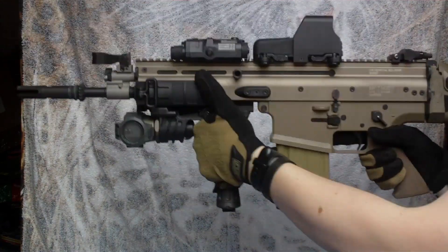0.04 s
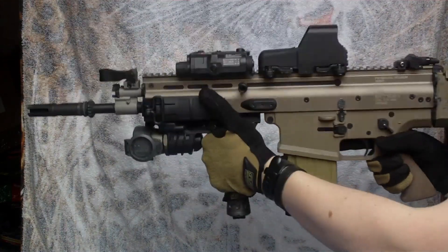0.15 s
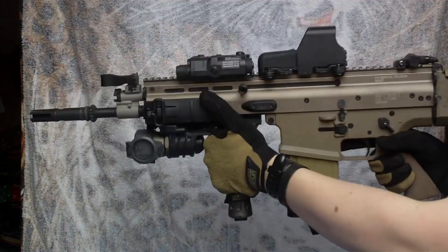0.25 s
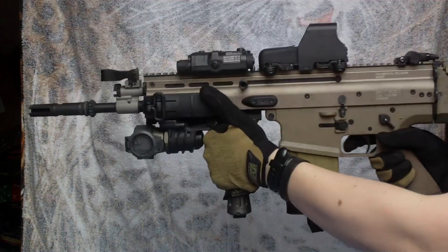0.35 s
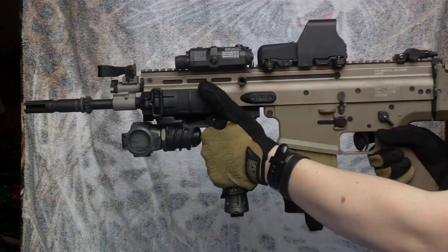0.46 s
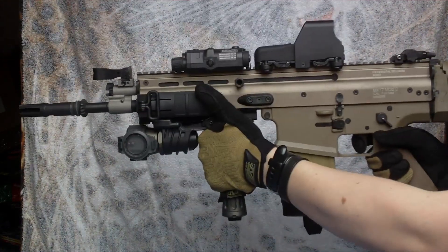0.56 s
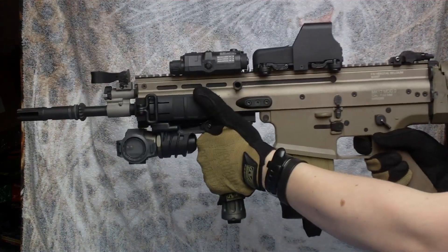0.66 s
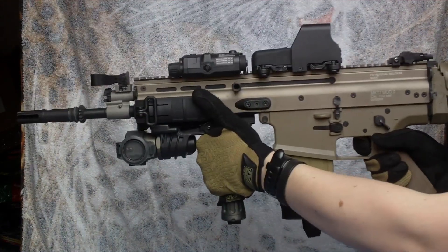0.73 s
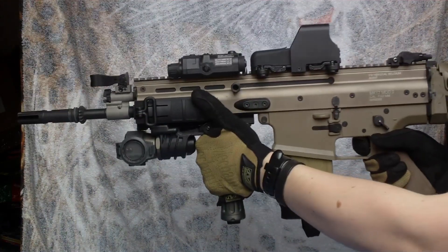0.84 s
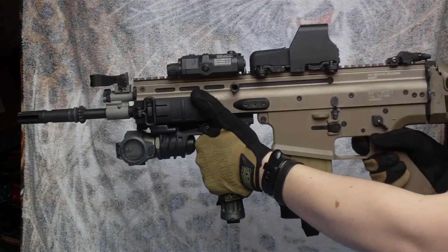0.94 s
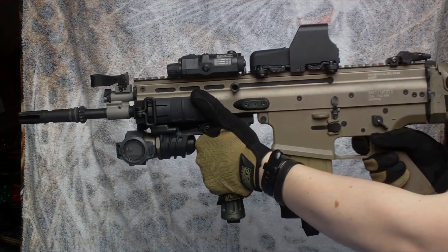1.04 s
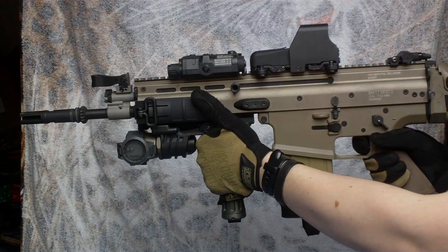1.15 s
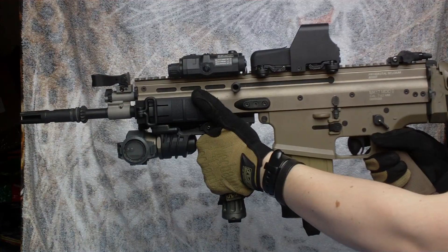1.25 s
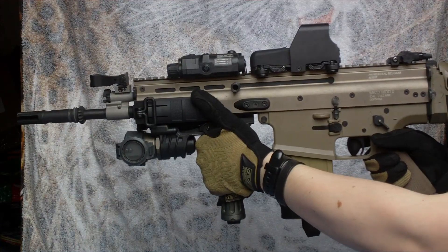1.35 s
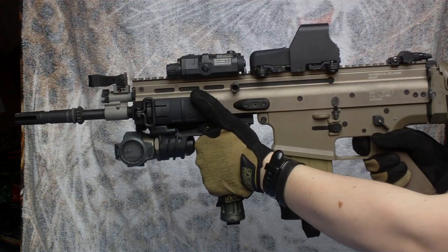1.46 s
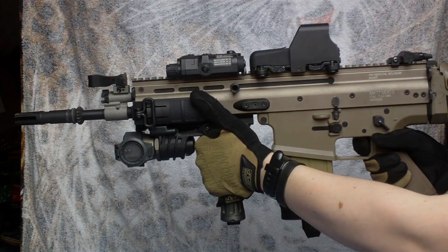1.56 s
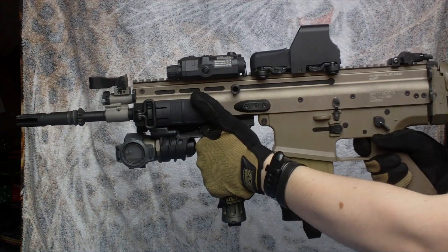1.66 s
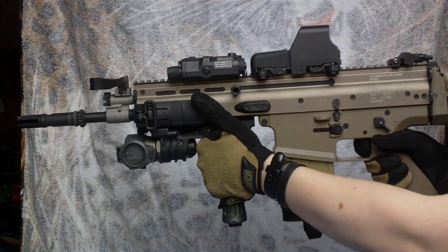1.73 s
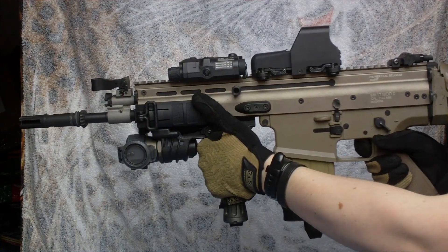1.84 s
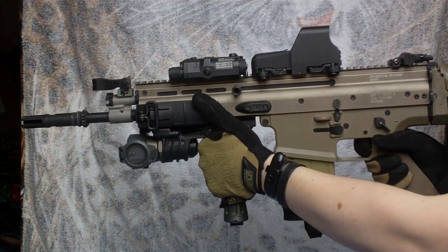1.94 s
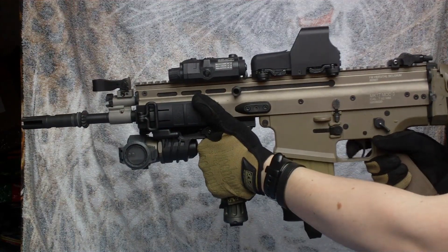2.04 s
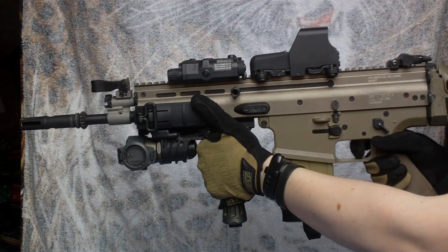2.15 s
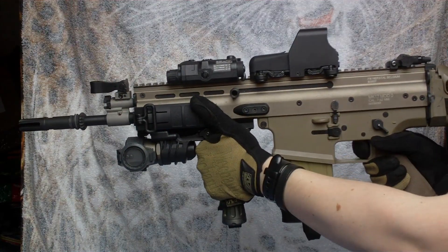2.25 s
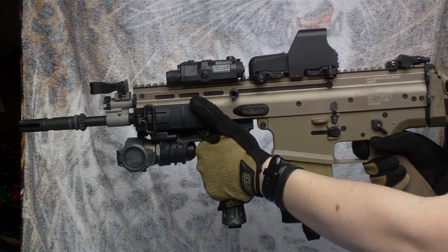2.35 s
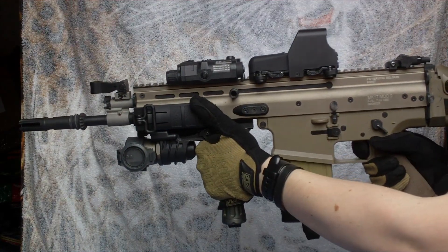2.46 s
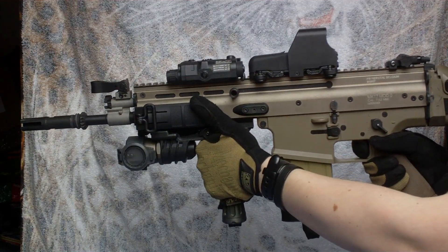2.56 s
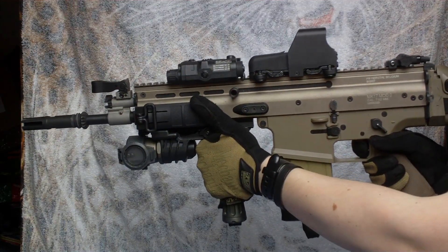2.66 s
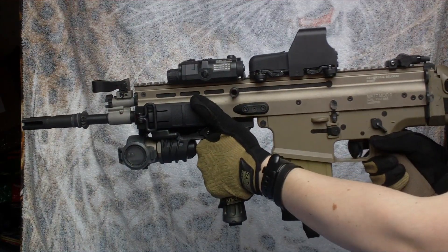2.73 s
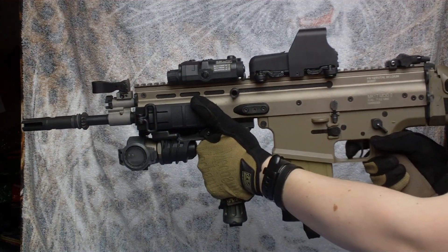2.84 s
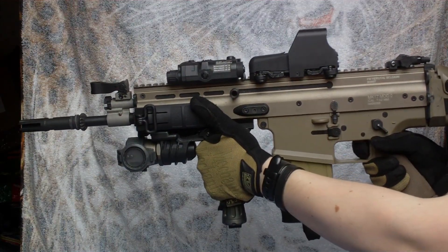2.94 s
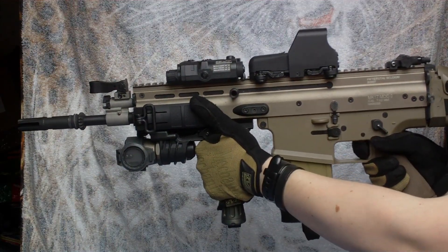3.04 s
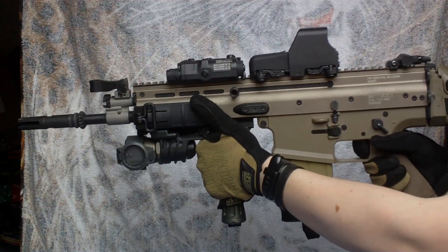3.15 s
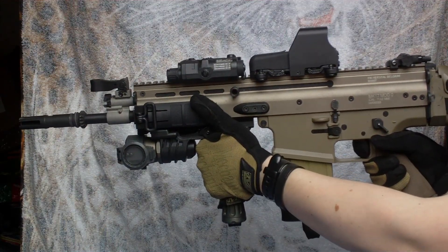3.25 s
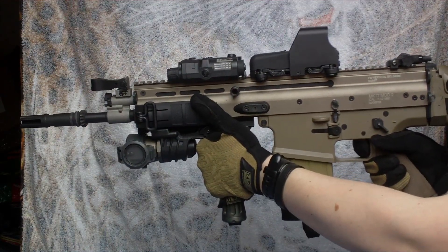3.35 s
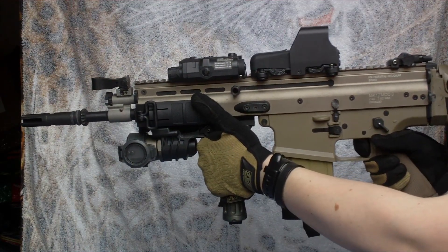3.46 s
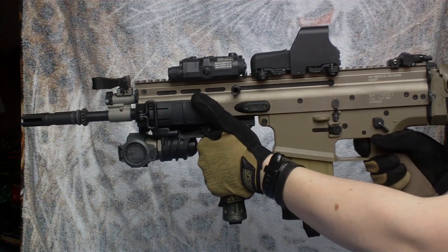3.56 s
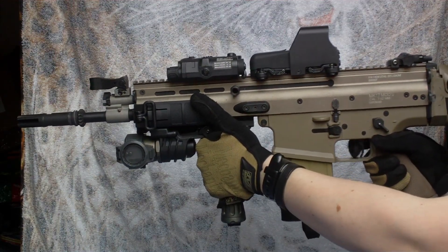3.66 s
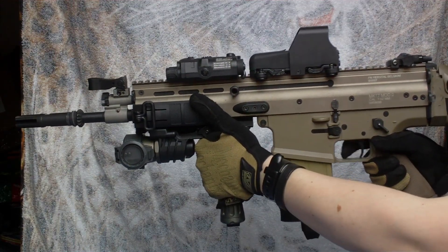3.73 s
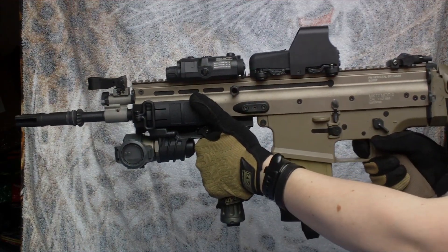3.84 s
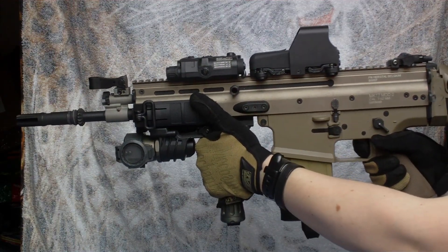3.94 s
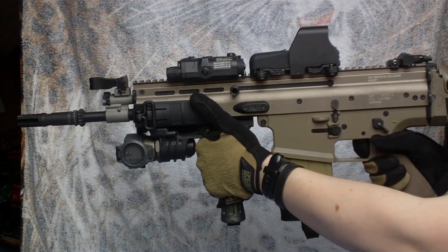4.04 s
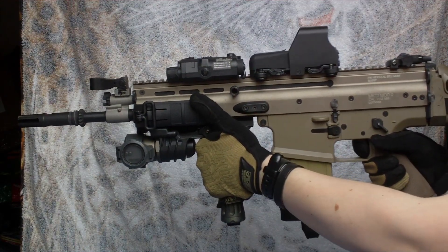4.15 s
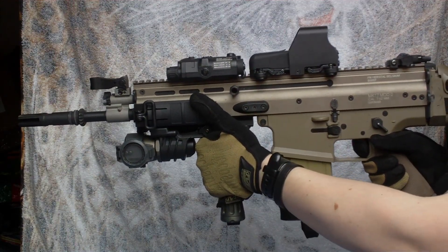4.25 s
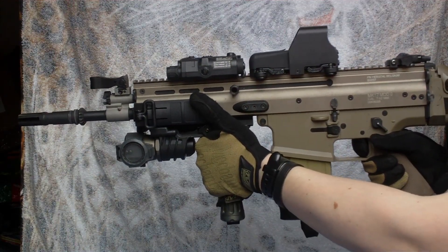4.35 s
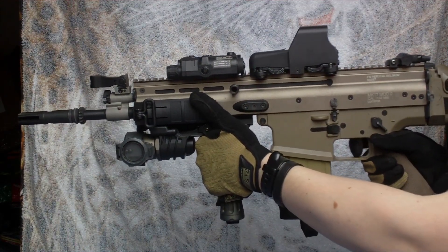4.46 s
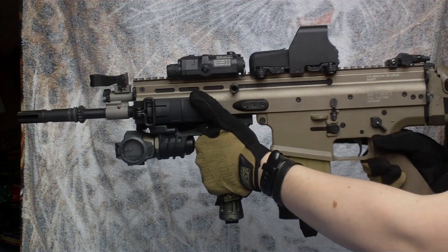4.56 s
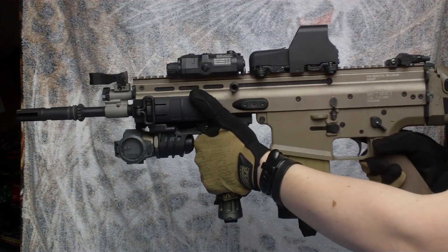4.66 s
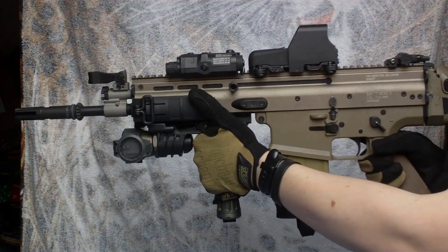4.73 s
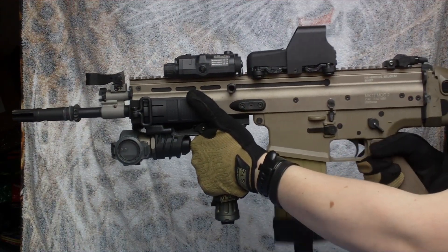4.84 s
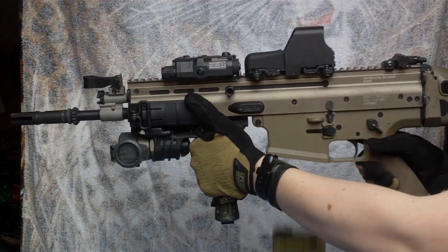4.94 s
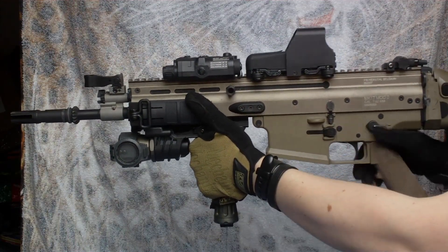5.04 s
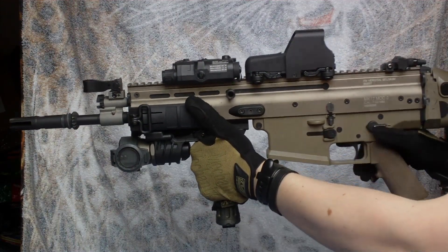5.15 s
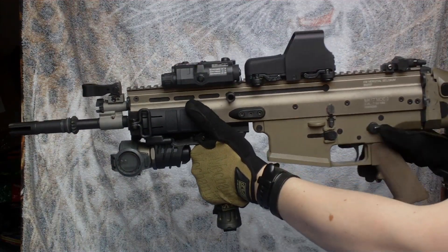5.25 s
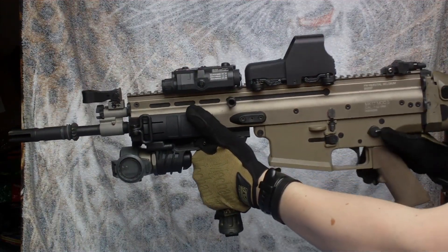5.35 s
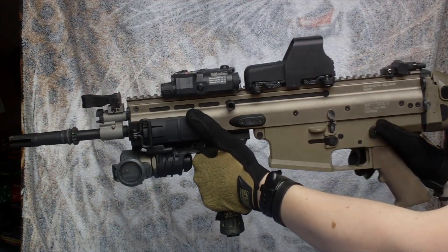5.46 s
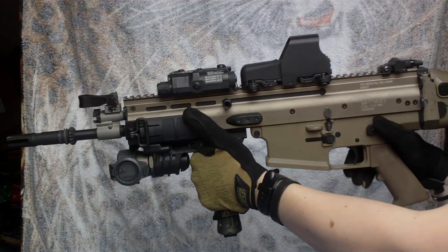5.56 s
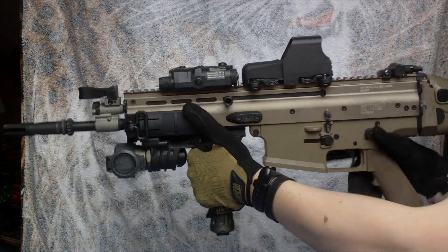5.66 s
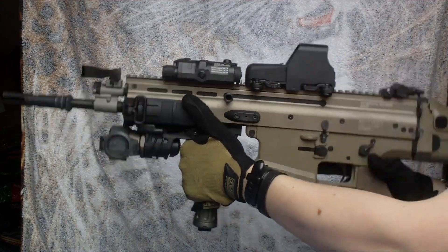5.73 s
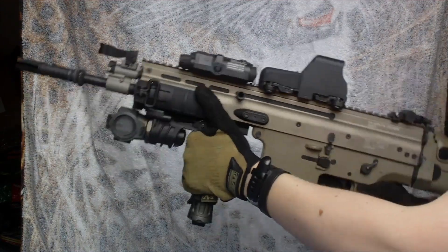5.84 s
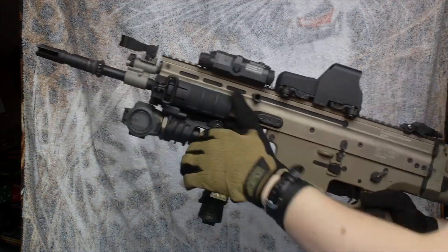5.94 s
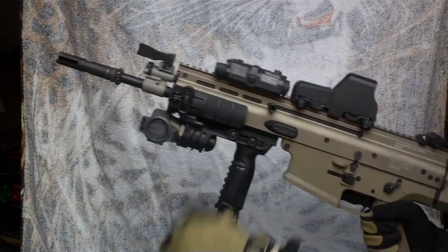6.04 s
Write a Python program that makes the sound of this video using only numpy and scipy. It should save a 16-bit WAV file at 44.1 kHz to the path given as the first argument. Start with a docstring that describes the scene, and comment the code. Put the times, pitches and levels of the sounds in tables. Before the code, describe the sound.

An airsoft electric rifle rattles off four rapid full-auto bursts in a small room, pellets smacking a target, then a dry burst and selector clicks.

```python
"""In a small room an airsoft electric rifle fires full-auto bursts; late in the fourth the magazine runs empty, the fifth is dry.
Motor-driven gear chatter is noise paced by motor speed; the piston slams about 13 times a second, ringing the receiver modes.
Air pops from the muzzle at each stroke, and each pellet smacks into a target. Gears coast, and after most bursts knock back.
Filtered noise also gives trigger and selector clicks, fitting knocks, cloth rubs and a quiet hiss."""
import sys
import numpy as np
from scipy import signal
from scipy.fft import rfft, irfft, next_fast_len
from scipy.io import wavfile

SR = 44100
rng = np.random.default_rng(int(sys.argv[2]) if len(sys.argv) > 2 else 0)


def materialize(psi):
    """Save the field psi as 16-bit PCM at rate SR to the path in sys.argv[1].

    A 1-D psi becomes a single channel; in a 2-D psi each row is a channel.
    """
    bounded = np.clip(np.atleast_2d(psi).T, -1, 1)
    quanta = np.round(bounded * 32767).astype(np.int16)
    wavfile.write(sys.argv[1], SR, quanta)


N = 269010
TIME = np.arange(N) / SR  # s
RING = np.arange(SR // 6) / SR  # s since a blow
EMPTY_S = 3.655  # the magazine runs out

# trigger pulls: motor_on_s, first_shot_s, second_shot_s, shot_period_s, motor_off_s,
# strength_db (relative), closing_db (extra thump of the last shots)
TRIGGER_PULLS = [(0.791, 0.868, 0.946, 0.0743, 1.358, 0, 5), (1.54, 1.6199, 1.701, 0.0749, 2.122, -0.2, 4),
                 (2.301, 2.371, 2.4536, 0.0738, 2.836, -0.6, 0),
                 (3.077, 3.137, 3.2185, 0.075, 3.765, -0.2, 2),
                 (3.962, 4.0007, 4.0867, 0.0753, 4.575, 0, 1)]
# receiver modes: pitch_hz (centre), t60_s, loaded_db (relative, pellet in barrel), empty_db (relative)
RECEIVER_MODES = [(150, 0.09, -21.5, -17), (240, 0.05, -30, -21), (351, 0.12, -35, -19),
                  (440, 0.08, -8, -10), (524, 0.075, -4, -3.5), (638, 0.06, -6, 2), (787, 0.058, -12, -9.5),
                  (901, .06, 0.5, 2), (1088, .055, 1.5, 2.5), (1172, 0.044, 0.5, 7), (1385, .06, -3.5, -4),
                  (1627, 0.074, -8, -12.5), (1853, 0.13, -9, -5.5), (2030, 0.054, -8, -7.5),
                  (2240, 0.077, -8.5, -13.5), (2803, 0.029, 0, -8.5), (3170, 0.045, 0.5, -1),
                  (4855, 0.07, -18, -4), (5280, 0.06, -7.5, -5)]
# colour of thin ringing metal: freq_hz, density_db (relative, per Hz)
METAL_EDGE = [(50, -58), (1000, -32.5), (4000, -8), (5500, 1), (9000, 0.5), (11200, 0.5), (12500, -5),
              (16000, -5)]


def amp(db):
    """Decibels to linear amplitude."""
    return 10 ** (np.asarray(db) / 20)


def unit(x):
    """Scale a signal to an RMS of one."""
    return x / np.sqrt(np.mean(x ** 2) + 1e-20)


def along(points, hz):
    """Interpolate (Hz, value) points on a log frequency axis."""
    f, v = np.transpose(points)
    return np.interp(np.log(hz + 1), np.log(f + 1), v)


def coloured(x, spectrum, peaks=()):
    """Filter x causally with a spectrum and resonant peaks (Hz, width, lift dB); white noise keeps its level."""
    hz = np.fft.rfftfreq(len(RING), 1 / SR)
    db = along(spectrum, hz)
    for f, width, lift in peaks:
        db = db + lift / (1 + (2 * (hz - f) / width) ** 2)
    # keeping half the cepstrum puts the response after the blow, never before it
    cepstrum = irfft(np.log(amp(db)))[:len(RING) // 2]
    response = irfft(np.exp(rfft(2 * cepstrum, len(RING))))
    return signal.oaconvolve(x, response / np.linalg.norm(response))[:len(x)]


def add(track, s, sound):
    """Mix a sound into the track at time s."""
    part = track[max(0, round(s * SR)):][:len(sound)]
    part += sound[:len(part)]


def blows(times, db, t60, spectrum):
    """Contacts ring countless short-lived modes: coloured noise under decays whose energies add."""
    energy = np.zeros(N)
    fade = amp(-60 * RING / t60) ** 2
    for s, level in zip(times, db):
        add(energy, s, amp(level) ** 2 * fade)
    return coloured(np.sqrt(energy) * rng.standard_normal(N), spectrum)


def ping(hz, db, t60, attack=0.0014):
    """One mode rings out: a decaying sine with a soft attack."""
    onset = 1 - np.exp(-RING / attack)
    return amp(db - 60 * RING / t60) * onset * np.sin(2 * np.pi * hz * RING)


def room(x, wet_db, gap=.006):
    """Near walls answer after a gap (s) with a diffuse noise tail whose treble dies first."""
    # decay of the room: freq_hz, t60_s
    decay = [(200, .34), (450, 0.34), (650, 0.24), (900, .27), (1400, 0.3), (3700, 0.28), (10000, .22),
             (16000, .19)]
    hz, t, z = signal.stft(rng.standard_normal(SR // 2), SR, nperseg=256)
    fade = amp(-60 * t / along(decay, hz)[:, None])
    tail = signal.istft(z * fade, SR, nperseg=256)[1]
    tail = np.pad(tail / np.linalg.norm(tail), (round(gap * SR), 0))
    return x + amp(wet_db) * signal.fftconvolve(x, tail)[:N]


def pellets(times):
    """Air leak, extra pop dB and extra smack dB of the pellet in each stroke; an ordinary one has none."""
    # pellets that seal badly, or pop or strike unusually: shot_s (nearest stroke), leak (0-1),
    # extra_pop_db, extra_smack_db
    odd_pellets = [(1.245, .55, 0, -6), (1.32, .6, -6, 4.5), (1.62, .05, 9, 2), (1.776, .05, 0, 2.5),
                   (1.851, 0, -6, 0), (1.926, .3, 8, -1), (2.002, .9, -6, -6), (2.077, .9, 8, 0),
                   (2.372, 1, 14, 4), (2.454, 0, 5, 8.5), (2.527, 0, -9, 2), (2.602, .7, -6, 3),
                   (2.749, 0, 2, 4), (2.825, .7, -6, 6), (3.138, 1, 0, 5), (3.369, 0, -7, 2),
                   (3.443, .05, 5, 2), (3.519, .05, 5, 4), (3.594, 0, 6, 3)]
    traits = np.zeros((len(times), 3))
    for s, *row in odd_pellets:
        traits[np.argmin(np.abs(times - s))] = row
    return traits.T


def strokes(first_shot_db=3.8, settle_shots=1.6, leak_late_s=0.0025):
    """Every piston stroke: time, strength dB, extra thump dB, pellet loaded; the first cycle is slow."""
    rows = []
    for _, first, second, period, off, db, closing_db in TRIGGER_PULLS:
        times = np.append(first, np.arange(second, off, period))
        settle = np.exp(-np.arange(len(times)) / settle_shots)
        # a loaded burst opens with an extra-hard thump, then settles
        opening_db = first_shot_db * (first < EMPTY_S) * settle
        extra_db = opening_db + closing_db * settle[::-1]
        rows += [(s, db, extra) for s, extra in zip(times, extra_db)]
    s, db, extra_db = np.transpose(rows)
    late = leak_late_s * pellets(s)[0]  # a stroke with a leaking pellet comes a little later
    return s + late, db, extra_db, s < EMPTY_S


def background(hiss_db=-66.5):
    """Quiet room hiss is steady coloured noise; gloves and sling rub in smooth swells of cloth noise."""
    # colour of the hiss: freq_hz, density_db (relative, per Hz)
    hiss_colour = [(15, -54.5), (25, -29.5), (82, -22), (104, -8), (209, -8.5), (227, -9.5), (246, -6.5),
                   (368, -2.5), (495, 3.5), (7910, -9), (14300, -7), (15500, -14)]
    # colour of rubbing cloth: freq_hz, density_db (relative, per Hz)
    cloth_colour = [(59, -58.5), (100, -31), (416, -9), (570, -8), (2230, -11.5), (3110, -17),
                    (4640, -18.5), (15000, -20.5)]
    # gloves and sling rub: middle_s, half_length_s, level_db
    rubs = [(4.97, .06, -63), (5.19, .035, -61), (5.4, .12, -68), (5.8, .13, -59), (6.08, .1, -54.5)]
    rubbing = sum(amp(db) * np.exp(-((TIME - s) / half) ** 2) for s, half, db in rubs)
    cloth = rubbing * coloured(rng.standard_normal(N), cloth_colour)
    hiss = amp(hiss_db) * coloured(rng.standard_normal(N), hiss_colour)
    return cloth + hiss


def contacts(table, knock, knock_db, edge_db, knock_t60, tick_t60):
    """Small parts meet: a knock, a tick and a metal edge; a bright contact has more edge and less knock."""
    # colour of the tick: freq_hz, density_db (relative, per Hz)
    tick_colour = [(50, -56.5), (300, -31.5), (1200, -8), (2000, -0.5), (2600, 0), (3300, -1.5), (4300, -6),
                   (7000, -18.5), (15000, -40)]
    s, db, bright_db = np.transpose(table)
    body = blows(s, db + knock_db - bright_db, knock_t60, knock)
    tick = blows(s, db, tick_t60, tick_colour)
    edge = blows(s, db + edge_db + bright_db, tick_t60, METAL_EDGE)
    return body + tick + edge


def clicks(knock_t60, tick_t60):
    """One contact of each trigger, selector and fitting click: plastic knock, tick and metal edge."""
    # colour of the plastic knock: freq_hz, density_db (relative, per Hz)
    plastic = [(40, -46.5), (150, -31), (330, -27.5), (520, -6), (750, 1), (1100, 0.5), (1600, -7),
               (4000, -28)]
    # trigger and motor contacts: start_s, level_db (relative), brightness_db
    trigger = [(0.785, -48, 2), (1.553, -45, 2), (2.283, -49, 9), (2.316, -42, 0), (3.077, -47, 0),
               (3.962, -48, 1)]
    # the fire selector passes two notches and meets its stop: start_s, level_db (relative), brightness_db
    selector = [(5.19, -38, -1), (5.209, -37, 14), (5.215, -41, 15), (5.498, -28, 1), (5.526, -24, 5.5),
                (5.539, -28, -7)]
    # loose fittings knock as the rifle is moved: start_s, level_db (relative), brightness_db
    fittings = [(0.213, -63, -8), (0.727, -64, -1), (0.746, -67, -8), (4.865, -49, -9), (4.877, -54, -6),
                (4.929, -57, 4), (4.946, -63, 10), (4.99, -54, -9), (5.107, -62, -9), (5.165, -62, -10),
                (5.376, -59, 4), (5.649, -50, 5), (5.785, -51, 0), (5.843, -49, 4), (5.963, -50, 9)]
    decays = dict(knock_t60=knock_t60, tick_t60=tick_t60)
    return (contacts(trigger, plastic, knock_db=6, edge_db=7, **decays)
            + contacts(selector + fittings, plastic, knock_db=-6, edge_db=-6, **decays))


def handling(strike_db=3, bounce_db=1.5, bounce_s=.004):
    """Trigger, selector and fittings click and bounce once; small parts ring on as decaying sines."""
    # selector lever and loose fittings ring on: start_s, pitch_hz, level_db, t60_s
    small_rings = [(5.498, 2450, -17, 0.04), (5.498, 2740, -20, 0.04), (5.527, 1103, -19, 0.069),
                   (5.527, 895, -22, .08), (5.527, 700, -29, .14), (5.963, 3160, -50, 0.11)]
    out = amp(strike_db) * clicks(knock_t60=0.1, tick_t60=0.046)
    add(out, bounce_s, amp(bounce_db) * clicks(knock_t60=0.054, tick_t60=.04))
    for s, hz, db, t60 in small_rings:
        add(out, s, ping(hz, db, t60))
    return out


def backlash(gain_db=4):
    """The spring throws the stopped gears back on their latch, and the gearbox shell rings on."""
    # knocks on the latch: start_s, level_db (relative), brightness_db
    knocks = [(1.411, -29.5, 0), (2.184, -27, -1), (2.926, -36.5, 0), (4.65, -32, -1.5)]
    # colour of the knock: freq_hz, density_db (relative, per Hz)
    knock_colour = [(40, -45.5), (150, -28), (300, -23.5), (450, -4.5), (650, 6.5), (1100, 0.5),
                    (1600, -0.5), (4000, -26.5)]
    # shell ring: pitch_hz, level_db (relative to the level column of the knocks), t60_s
    shell_ring = (668, -10, 0.36)
    out = amp(gain_db) * contacts(knocks, knock_colour, knock_db=1, edge_db=-2, knock_t60=0.088, tick_t60=0.07)
    hz, ring_db, t60 = shell_ring
    for s, db, _ in knocks:
        add(out, s, ping(hz, db + ring_db, t60))
    return out


def gears(spin_up=.038, coast=0.029, tooth_rate=900, shaft_hz=268, scatter_db=5, rub=0.5):
    """Loose gear teeth chatter at a rate that follows the motor; the load grows as the spring is drawn."""
    # colour of the gear noise: freq_hz, density_db (relative, per Hz)
    gear_colour = [(60, -49.5), (150, -35.5), (220, -35.5), (320, -27.5), (420, -7.5), (600, -2),
                   (1100, -1.5), (2000, 1), (3300, -2.5), (4600, -3.5), (7000, -13.5), (11000, -12.5),
                   (12500, -28), (16000, -30)]
    # gearbox resonances: pitch_hz, width_hz, lift_db (above the rest)
    gearbox = [(845, 81, 4), (1360, 90, 0), (1750, 110, 2), (2110, 90, 2.5), (2840, 110, 6),
               (3180, 230, 4.5)]
    loaded_db, empty_db = -20.4, -25.1  # relative: the drive is louder while it feeds pellets
    speed, level = np.zeros((2, N))
    for on, _, _, _, off, db, _ in TRIGGER_PULLS:
        rise = 1 - np.exp(-np.maximum(TIME - on, 0) / spin_up)
        run = rise * np.exp(-np.maximum(TIME - off, 0) / coast)
        speed += run
        level += amp(db) * run
    feeding = np.exp(-np.maximum(TIME - EMPTY_S, 0) / coast)
    level *= amp(empty_db + (loaded_db - empty_db) * feeding)
    # play between the teeth scatters the contacts; tooth_rate is per second at full speed
    struck = rng.random(N) < tooth_rate * (.5 + .5 * speed) / SR
    energy = struck * amp(scatter_db * rng.uniform(-0.74, 1, N)) ** 2
    contact = np.sqrt(np.abs(signal.fftconvolve(energy, amp(-60 * RING / 0.0064))[:N]))
    drive = (unit(contact) + rub) * rng.standard_normal(N)
    # the pinion presses harder once a turn; shaft_hz is its rate at full speed
    turns = shaft_hz * np.cumsum(speed) / SR
    drive *= amp(1.5 * np.sin(2 * np.pi * turns))
    starts = np.append(0, strokes()[0])
    since = TIME - starts[np.searchsorted(starts, TIME, "right") - 1]
    slack_db = -2.5 * np.exp(-since / 0.0087)  # the load is lightest just after a stroke
    return level * amp(slack_db - 3.0) * unit(coloured(drive, gear_colour, gearbox))


def target(flight_s=0.0226, leak_flight_s=0.0142, leak_smack_db=-3, scatter_db=1):
    """Each pellet flies to the trap, smacks it, strikes its back wall and leaves it rattling; leaks slow it."""
    # colour of the trap: freq_hz, density_db (relative, per Hz)
    trap = [(50, -42.5), (300, -20), (550, 2.5), (1100, 8), (1800, 4), (4000, 2), (6300, 3.5), (8000, -2.5),
            (12500, -1), (16000, -6)]
    smack_db, rattle_db = -21.2, -24.8  # relative
    fired, strength_db, _, loaded = strokes()
    leak, _, extra_db = pellets(fired)
    s = (fired + flight_s + leak_flight_s * leak)[loaded]
    hit_db = smack_db + (extra_db + leak_smack_db * leak)[loaded] + scatter_db * rng.standard_normal(len(s))
    smack = blows(s + .0004, hit_db + 9.5, t60=.012, spectrum=trap)
    back_wall = blows(s + 0.0052, hit_db + 3.5, t60=.012, spectrum=trap)
    rattle = blows(s + 0.00037, rattle_db + 5.0 + strength_db[loaded], t60=.1, spectrum=trap)
    return smack + back_wall + rattle


def recoil(times, db):
    """The released spring gives the whole rifle one low push: a single impulse through a bass filter."""
    # colour of the push: freq_hz, density_db (relative, per Hz)
    push_colour = [(20, -24), (65, -21), (100, 0), (125, 6), (155, 7.5), (200, -5), (500, -16)]
    push = np.zeros(N)
    push[np.round(times * SR).astype(int)] = amp(db)
    return coloured(push, push_colour)


def muzzle(times, db, t60=.006, length=0.0013):
    """Air leaves the barrel at every stroke: one short noise pop, repeated at different levels."""
    # colour of the pop: freq_hz, density_db (relative, per Hz)
    pop_colour = [(70, -66), (300, -35), (500, -22), (1500, -6), (2900, 10), (4000, -2), (6000, -18.5),
                  (15000, -36.5)]
    pop = coloured(rng.standard_normal(len(RING)) * amp(-60 * RING / t60), pop_colour)
    pop *= np.sqrt(length * SR) / np.linalg.norm(pop)  # energy of unit-level noise of this length (s)
    out = np.zeros(N)
    for s, level in zip(times, db):
        add(out, s, amp(level) * pop)
    return out


def receiver(loaded, phases, attack, scatter_db):
    """The receiver rings as decaying sines; a pellet in the barrel changes which modes the piston drives."""
    hz, t60, loaded_db, empty_db = np.transpose(RECEIVER_MODES)[:, :, None]
    mode_db = loaded_db if loaded else empty_db
    size = amp(mode_db + scatter_db * rng.standard_normal(hz.shape))
    pitch = hz * (1 + 0.01 * rng.standard_normal(hz.shape))
    modes = size * np.sin(2 * np.pi * pitch * RING + phases) * amp(-60 * RING / t60)
    ring = modes.sum(0) / np.linalg.norm(size) * (1 - np.exp(-RING / attack))
    ring *= 1 - (RING / RING[-1]) ** 4  # ends in silence
    small_body = signal.butter(2, 360, "high", fs=SR, output="sos")  # a small body radiates little bass
    return signal.sosfilt(small_body, ring)


def shots(bounces=(.0004, .0027, .005), thump_scatter_db=.5, pop_scatter_db=1):
    """The piston is released, drives the pellet out, hits the cylinder head and chatters against it."""
    # piston stroke with a pellet: thump_db, pop_db, clack_db (all relative), air_cushion_lag_s (before
    # the early start of the swell), release_lead_s
    loaded_stroke = (-17, -10.8, -19.6, 0.0034, 0.0001)
    # piston stroke without one: thump_db, pop_db, clack_db (all relative), air_cushion_lag_s, release_lead_s
    empty_stroke = (-17.3, -17, -19, 0, 0.0021)
    # colour of the metal clack: freq_hz, density_db (relative, per Hz)
    clack = [(50, -38.5), (300, -30), (450, -2), (1100, 3), (1700, 0), (3500, 2.5), (5300, 4.5),
             (7000, -0.5), (11200, -0.5), (12300, -11), (16000, -5)]
    leak_pop_db, leak_clack_db = -15, -4.5  # a full leak weakens pop and clack
    s, strength_db, extra_db, loaded = strokes()
    leak, extra_pop_db, _ = pellets(s)
    thump_db, pop_db, clack_db, lag, lead = np.where(loaded[:, None], loaded_stroke, empty_stroke).T
    chance = rng.standard_normal((len(s), 2))
    thump_db = thump_db + strength_db + extra_db + thump_scatter_db * chance[:, 0]
    pop_db = pop_db + strength_db + extra_pop_db + leak_pop_db * leak + pop_scatter_db * chance[:, 1]
    clack_db = clack_db + strength_db + leak_clack_db * leak

    snap = blows(s - lead, clack_db - 1.5, t60=.03, spectrum=clack)  # the rack slides off the last tooth
    snap += recoil(s - .006, thump_db - 5)
    snap += muzzle(s + .0003, pop_db)
    for delay, db in zip(bounces, [8, 7, 10]):
        snap += blows(s + delay, clack_db + db, t60=0.014, spectrum=clack)
    snap += blows(s + 0.0073, clack_db - 4.5, t60=0.17, spectrum=METAL_EDGE)  # the slack spring buzzes on

    body = np.zeros(N)
    phases = rng.uniform(0, 2 * np.pi, (len(RECEIVER_MODES), 1))
    for start, db, pellet in zip(s + lag, thump_db, loaded):
        contact = phases + .5 * rng.standard_normal(phases.shape)
        if pellet:  # air trapped behind the pellet slows the piston, so the ring swells gradually
            ring = receiver(True, contact, attack=0.0024, scatter_db=3.3)
            add(body, start - .0014, amp(db + 11.0) * ring)
        else:
            ring = receiver(False, contact, attack=0.00015, scatter_db=2.2)
            add(body, start, amp(db + 10.0) * ring)
    return room(snap, wet_db=-6) + room(body, wet_db=-14, gap=0.014)


def scene():
    mechanism = room(gears() + backlash(), wet_db=-5.5)
    rifle = shots() + mechanism + room(handling(), wet_db=-7)
    return (rifle + room(target(), wet_db=-8) + background())[None]


def record(dry, top=0.96, top_hz=15550):
    """The loudest peaks are rounded off below full scale; nothing is kept above the band limit."""
    held = dry / (1 + np.abs(dry / top) ** 6) ** (1 / 6)
    size = next_fast_len(N + SR // 4)
    in_band = np.fft.rfftfreq(size, 1 / SR) < top_hz
    return irfft(rfft(held, size) * in_band, size)[:, :N]


dry = scene()
out = record(dry)
materialize(out)
```